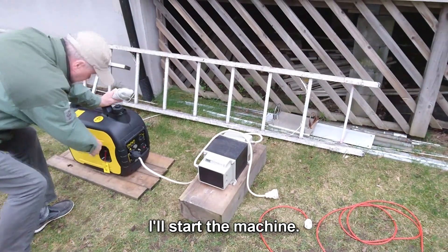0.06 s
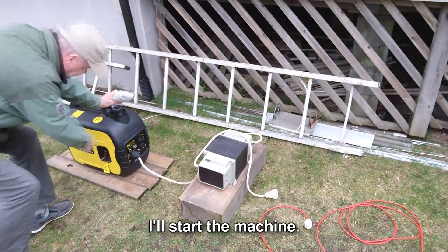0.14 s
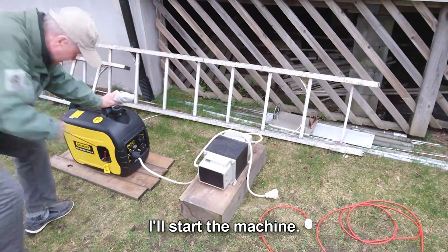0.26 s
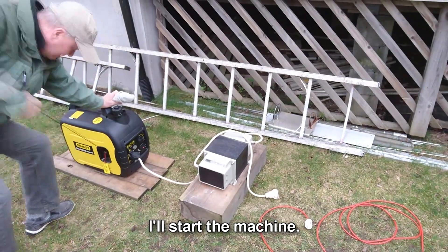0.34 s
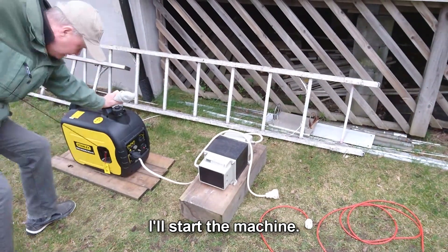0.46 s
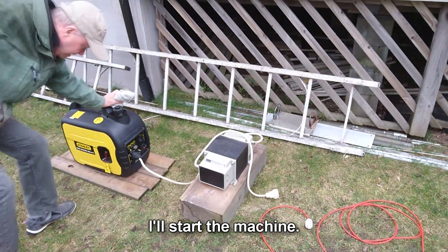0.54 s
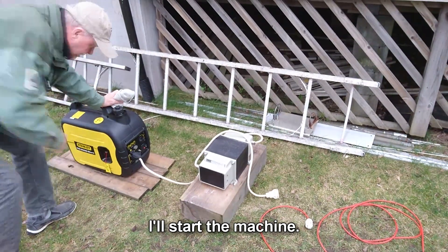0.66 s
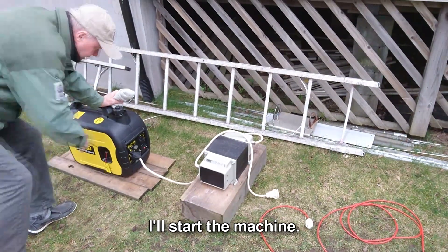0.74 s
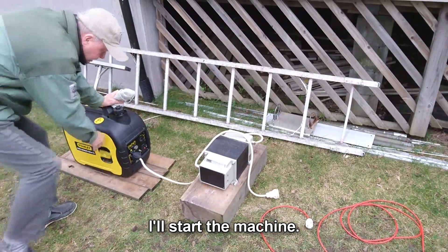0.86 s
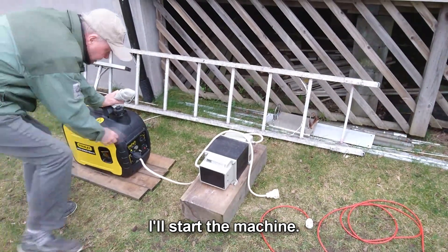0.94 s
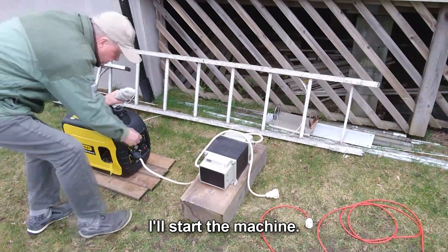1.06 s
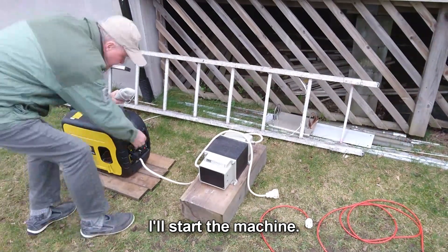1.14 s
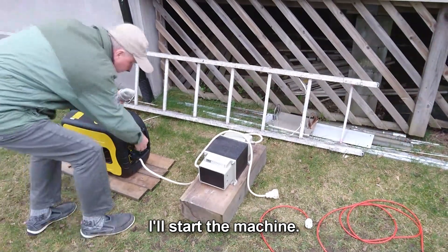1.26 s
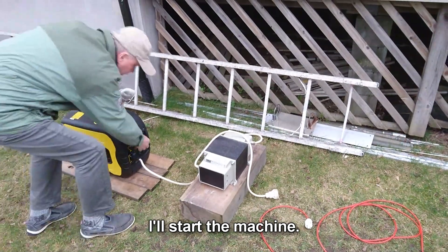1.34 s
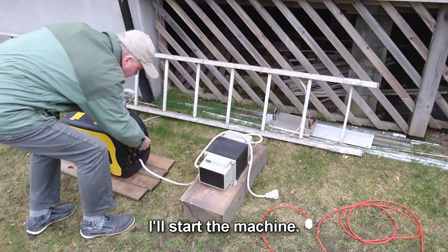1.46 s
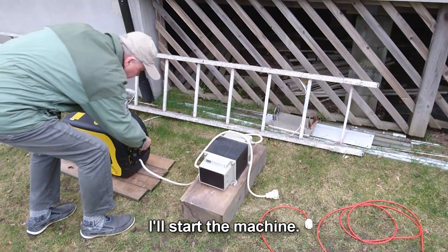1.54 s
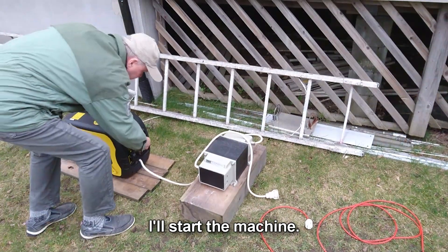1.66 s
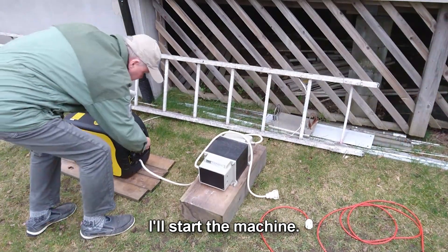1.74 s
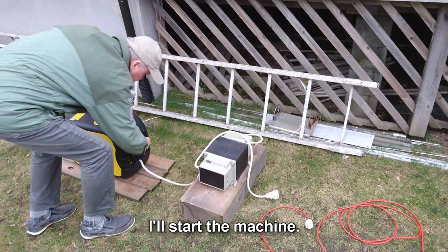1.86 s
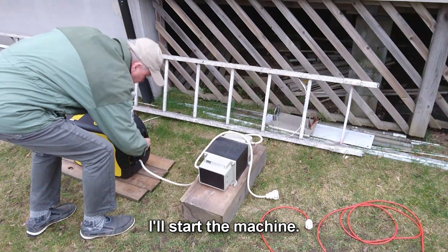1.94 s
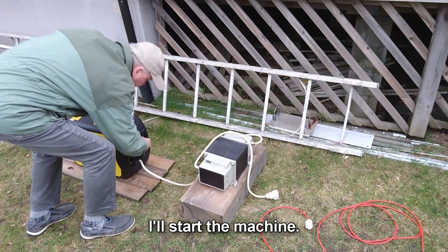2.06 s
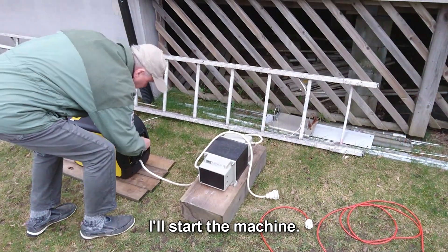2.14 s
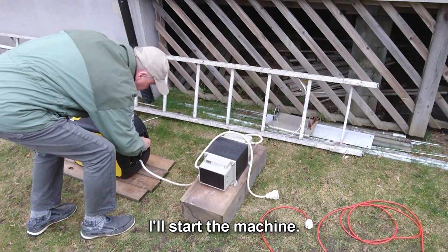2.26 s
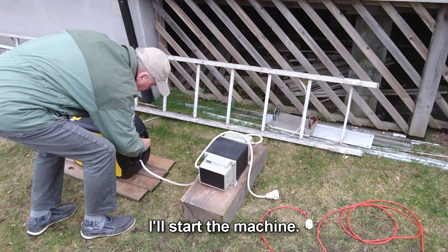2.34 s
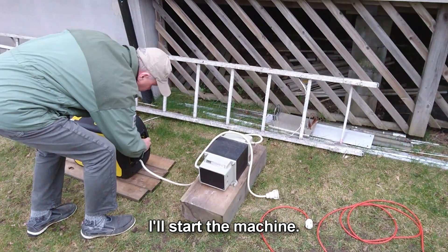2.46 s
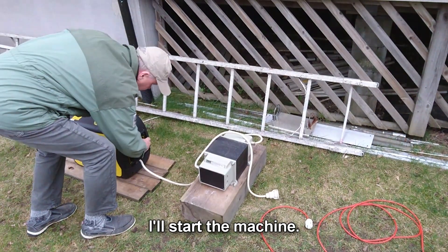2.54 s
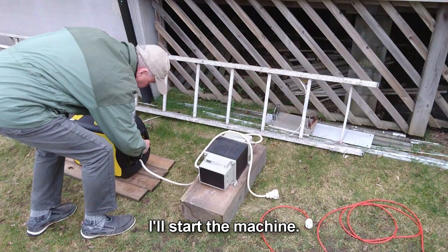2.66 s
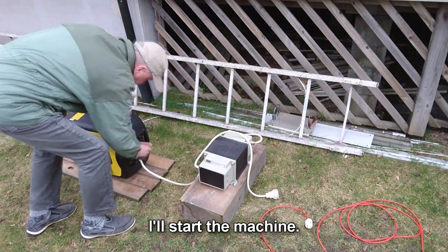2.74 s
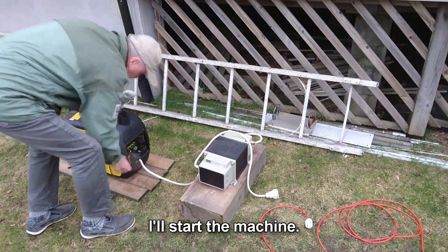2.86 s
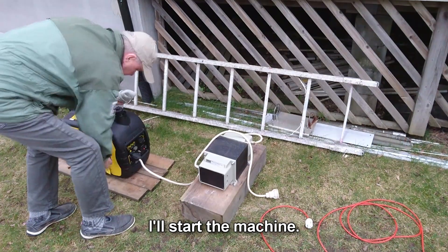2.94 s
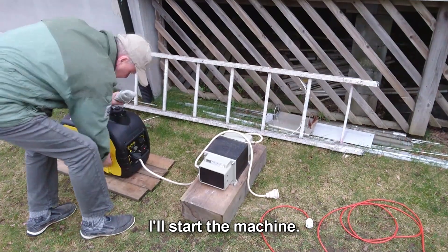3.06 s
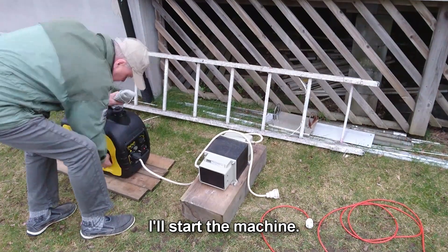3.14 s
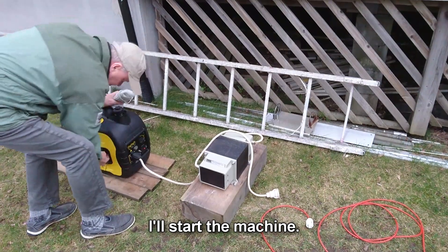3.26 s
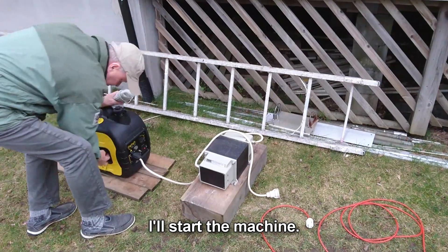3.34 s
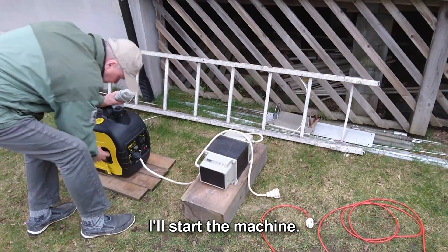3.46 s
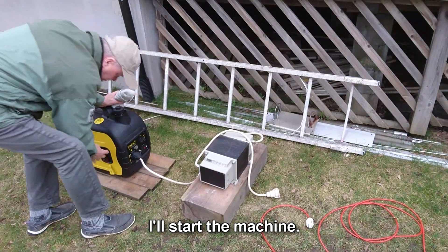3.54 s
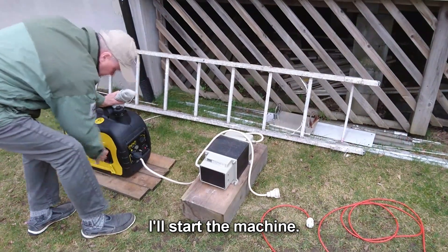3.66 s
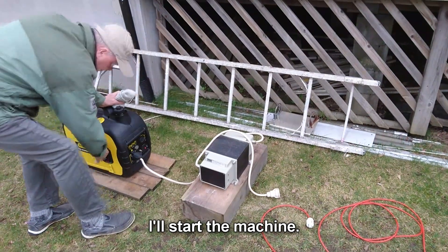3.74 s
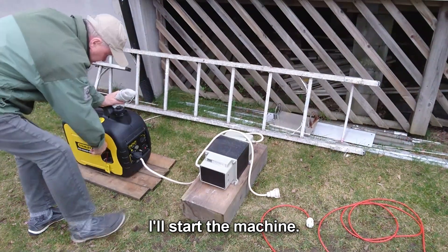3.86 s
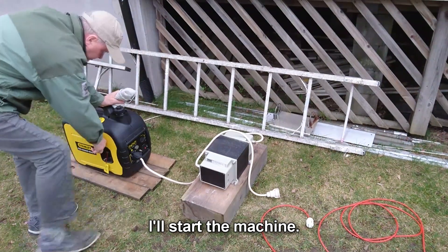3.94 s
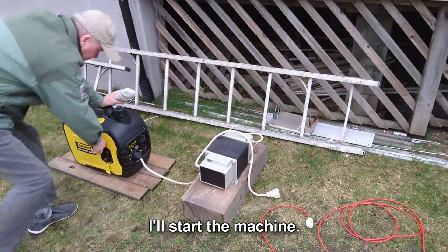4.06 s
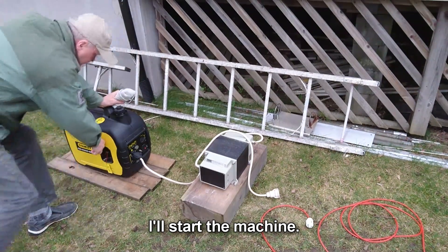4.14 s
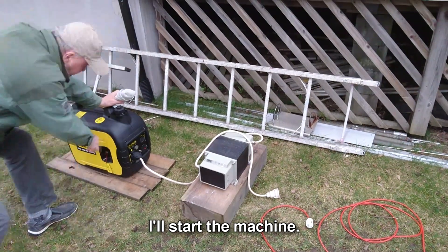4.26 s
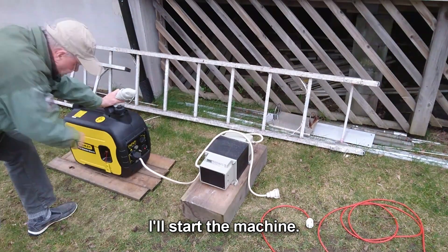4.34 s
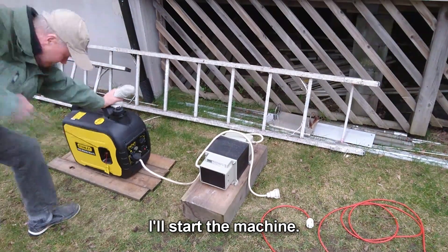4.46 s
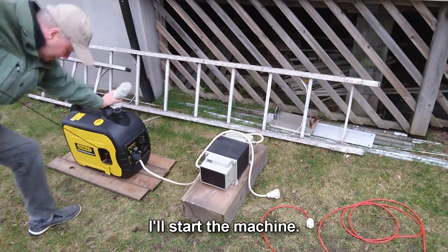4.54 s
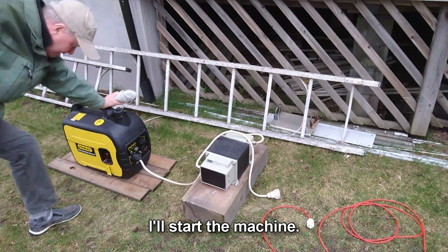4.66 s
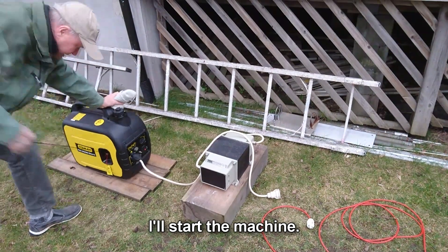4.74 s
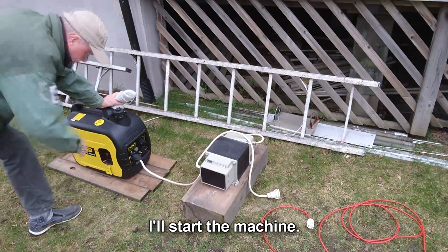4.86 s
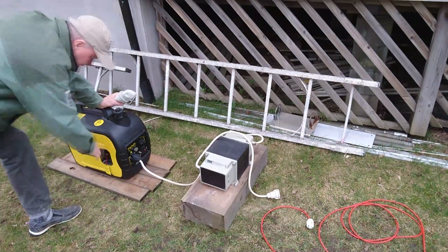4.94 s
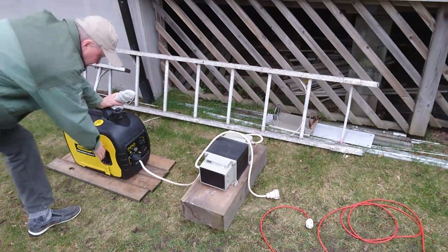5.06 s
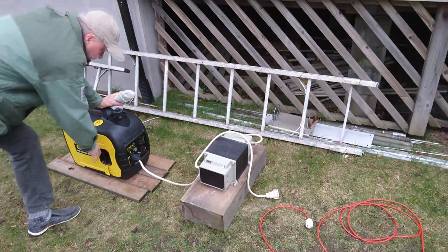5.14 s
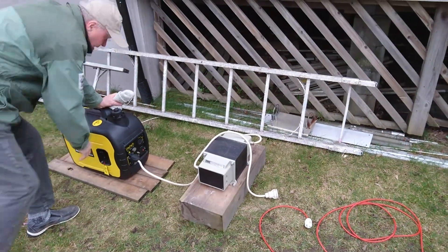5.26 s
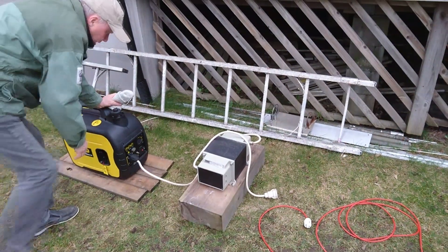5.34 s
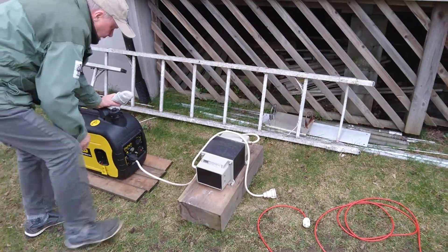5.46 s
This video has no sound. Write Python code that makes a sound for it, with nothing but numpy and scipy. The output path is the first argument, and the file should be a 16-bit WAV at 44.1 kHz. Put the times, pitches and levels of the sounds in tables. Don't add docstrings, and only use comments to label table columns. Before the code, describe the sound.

In a quiet yard, a portable petrol generator on wooden boards gets a cord pull: rising reel whine, clatter, low piston gasps. It fails and the handle slaps the plastic shell hard. Soft shuffling and a few knob clicks follow, then a second pull catches, coughing into quickening heavy puffs and bright valve ticking. Close, nearly mono microphone, flattening on the loudest beats.

```python
import sys
import numpy as np
from scipy import signal
from scipy.fft import rfft, irfft
from scipy.io import wavfile

SR = 44100
rng = np.random.default_rng(int(sys.argv[2]) if len(sys.argv) > 2 else 0)


def store_wav(level_fs):
    pcm = np.round(np.clip(np.atleast_2d(level_fs), -1, 1) * 32767)
    wavfile.write(sys.argv[1], SR, pcm.T.astype(np.int16))


def nominal_scale(level):
    x = np.asarray(level, float) / 20
    return 10 ** x


N = 242991
TIME = np.arange(N) / SR

# (frequency [Hz], level [dB per Hz])
YARD_CURVE = [(8.8, -47), (15, -14.5), (54, 1.5), (67, -5), (81, -26.5), (133, -21), (344, -34.5),
              (400, -25.5), (520, -54), (880, -120)]
RUMBLE_CURVE = [(12, -23.5), (22, -1.5), (55, -0.5), (100, -5), (200, -15), (300, -22), (500, -65)]
CLATTER_CURVE = [(120, -27), (200, -10.5), (405, 0.5), (534, 1), (609, -1), (972, -5.5), (1140, -3.5),
                 (1690, -11), (2390, -12.5), (3500, -22.5), (4550, -41.5), (7700, -120)]
HISS_CURVE = [(1470, -9), (2500, -5.5), (3220, -22), (3590, -8), (5990, -11), (8070, -14), (11500, -10.5),
              (15400, -29.5), (16400, -30)]
# (frequency [Hz], level [dB per Hz])
SPIT_CURVE = [(1760, -53), (3000, -9.5), (4100, -1.5), (6790, -1), (7450, -5.5), (10800, 3), (14500, -15),
              (16400, 4)]
# (frequency [Hz], side against mid [dB])
WIDTH_CURVE = [(25, -30), (110, -28), (200, -23), (380, -24), (700, -32), (1290, -22.5), (2380, -16.5),
               (4400, -15.5), (8120, -22), (15000, -32)]
# (time [s], shaking [dB], air and cord flow [dB])
EFFORT = [(0.0, -62, -65), (0.15, -51.5, -60), (0.35, -41.5, -51), (0.6, -41.5, -53), (0.84, -45, -56),
          (1.2, -49.5, -62.5), (1.6, -63, -68.5), (2.3, -66, -76), (3.04, -66.5, -65.5),
          (3.56, -67.5, -73.5), (3.9, -58, -67.5), (4.26, -67.5, -69), (4.355, -44, -62.5), (4.4, -48, -50),
          (4.57, -39.5, -43.5), (5.06, -38, -57.5), (5.26, -35.5, -52), (5.51, -31.5, -46)]
# (time [s], level [dB])
ROCKING = [(0.06, -36.5), (0.161, -33), (0.39, -38), (0.52, -29.5), (0.67, -42), (0.911, -30),
           (1.11, -43.5), (1.45, -52), (1.752, -47), (1.931, -54), (2.149, -48), (3.09, -37.5), (3.15, -38),
           (3.34, -42), (3.652, -44), (3.839, -37), (3.938, -31), (4.321, -34), (4.56, -34), (4.689, -29),
           (4.78, -24.5), (4.861, -25.5), (4.98, -23.5), (5.09, -20.5)]

# (time [s], peak [dB], ring [Hz], crack against ring [dB])
STEPS = [(1.398, -50, 410, -23), (1.439, -55, 1430, -1), (1.491, -55.5, 534, -1), (1.55, -48.5, 625, -25),
         (1.724, -51.5, 472, -20), (1.907, -42.5, 747, -15.5), (1.97, -49.5, 640, -41),
         (2.069, -55, 933, 3.5), (2.169, -63.5, 440, 3.5), (3.816, -41.5, 460, -28),
         (3.829, -42.5, 490, -4.5), (3.863, -64, 915, 11.5), (3.927, -45, 564, -12),
         (3.972, -59, 428, -0.5), (4.197, -56, 780, 1.5)]
KNOBS = [(2.988, -43.5, 697, -39), (3.086, -45, 400, -24), (3.1, -29.5, 1920, -22), (3.135, -20, 916, 0),
         (3.181, -39.5, 2100, -24), (3.302, -55, 3820, -11), (3.311, -46, 4100, -10.5),
         (3.315, -42.5, 475, -14), (3.328, -39, 900, -12), (3.436, -33, 1370, -17), (3.498, -38, 847, -30),
         (3.653, -38.5, 1090, -18), (3.702, -39, 1190, -23), (3.74, -43.5, 1050, -20.5),
         (3.767, -44, 507, -25)]
JOLTS = [(0.04, -40, 401, -8.5), (0.118, -41, 452, 0), (0.241, -37.5, 2360, -9.5), (0.373, -30.5, 496, -10),
         (0.471, -28, 705, -13), (0.545, -23, 760, -15), (0.637, -32, 470, -20), (0.746, -36.5, 521, -23),
         (0.786, -38, 506.7, -24), (4.29, -46, 455, -4), (4.333, -35.5, 2180, -16), (4.668, -23, 776, -22)]
HANDLE = [(0.879, -9, 1140, -4.5), (0.887, -9, 840, -18), (0.893, -9, 1250, -5.5), (0.898, -6, 1420, 0),
          (0.903, -10, 1538, -1.5), (0.916, -18.5, 2310, -26), (0.94, -15.5, 2140, -6),
          (0.989, -29.5, 1140, -8), (1.018, -38.5, 730, -3), (1.113, -39.5, 900, -13),
          (1.143, -29.5, 810, -21), (1.219, -40, 2300, -13), (1.228, -38.5, 505, -29),
          (5.12, -13, 1050, -4), (5.125, -15, 1240, -8), (5.13, -9.5, 3900, -8), (5.135, -17.5, 2450, 2.5)]

# (time [s], tooth rate [Hz], level [dB])
REEL_OUT = [(0.16, 330, -55), (0.19, 600, -37), (0.228, 1000, -39), (0.247, 1160, -33), (0.265, 1450, -50),
            (0.34, 2400, -52), (0.39, 3000, -51), (0.436, 3060, -53), (0.52, 3900, -59)]
REEL_COAST = [(0.59, 2810, -64), (0.63, 3330, -62), (0.66, 3490, -61), (0.68, 3637, -63)]
REEL_BACK = [(0.69, 3900, -58), (0.735, 3000, -59), (0.761, 2600, -60), (0.79, 2480, -57),
             (0.839, 2000, -60), (0.859, 2200, -59), (0.885, 2950, -50)]
REEL_AGAIN = [(4.3, 376.1, -58), (4.336, 614.0, -41), (4.38, 1170, -43), (4.41, 1900, -48),
              (4.43, 2320, -41), (4.46, 2700, -50), (4.52, 3350, -48), (4.585, 3640, -51)]
# (centre [Hz], width [Hz], level [dB])
OCTAVE_BANDS = [(3600, 700, -1), (6200, 1300, 1.5)]
# (centre [Hz], width [Hz], level [dB])
CASING_MODES = [(1220, 55, 0), (2430, 110, -3), (3740, 81, -6), (5500, 73, -11), (7280, 40, -9),
                (8730, 46, -11), (9510, 110, -11), (11200, 72, -13)]

# (time [s], length [ms], suction [dB], push [dB])
STROKES = [(.047, 5.5, -17, -68), (0.257, 12.4, -10, -7), (0.315, 6.8, -21, -23), (0.408, 15.2, -13, -8),
           (0.473, 3.5, -14, -18), (0.516, 16.7, -8.5, -2), (0.549, 17.8, -3.5, -3.5),
           (0.597, 39.6, -13.5, -28), (0.678, 14, -6.5, -1), (0.736, 5.2, -33, -19.5),
           (0.918, 3.4, -8.5, -16.5), (1.144, 4.7, -26.5, -26.5), (4.59, 11.6, -4.5, -9),
           (4.628, 8.3, -14.5, -39), (4.653, 21.8, -45, -6), (4.691, 13.2, -7.5, -15),
           (4.714, 6.1, -10.5, -16)]
# (centre [Hz], width [Hz], level [dB])
GEAR_BANDS = [(2370, 500, 6), (3830, 780, 3), (5880, 2000, -5.5), (7400, 500, -12)]
# (time [s], peak [dB])
STUMBLING_TICKS = [(0.5476, -23.5), (0.5751, -17.5), (0.664, -30), (0.675, -28), (4.547, -41), (4.565, -29),
                   (4.612, -15), (4.6182, -19), (4.6432, -6), (4.6489, -8.5), (4.656, -17), (4.672, -19),
                   (4.682, -19), (4.7056, -14.5), (4.7142, -20.5), (4.7451, -22), (4.7881, -10.5),
                   (4.8185, -21), (4.8546, -37.5), (4.8916, -49), (4.93, -24.5), (4.9604, -14.5),
                   (4.982, -34.5), (5.021, -31), (5.044, -33), (5.082, -35)]
# (time [s], peak [dB])
VALVE_TICKS = [(5.1822, -20), (5.197, -10.5), (5.2056, -15), (5.217, -16), (5.2305, -17), (5.243, -8),
               (5.2514, -16), (5.2628, -11), (5.2723, -10), (5.2869, -12), (5.3046, -13), (5.3157, -14),
               (5.3283, -4), (5.3432, -11), (5.3552, -11), (5.3688, -8.5), (5.3796, -9.5), (5.3917, -13.5),
               (5.4092, -7.5), (5.414, -9), (5.4294, -14), (5.4412, -3), (5.4521, -14), (5.4642, -9),
               (5.471, -9), (5.478, -14.5), (5.4854, -14.5), (5.4988, -9)]
# (time [s], four-stroke cycles done [count])
CRANK = [(4.748, 0), (4.893, 2), (5.019, 4), (5.126, 6), (5.22, 8), (5.304, 10), (5.381, 12), (5.452, 14),
         (5.522, 16)]
# (time [s], exhaust puff [dB], intake gulp [dB], puff lag [cycles])
BURN = [(4.74, -13, -22, .56), (4.8, -13, -13, .56), (4.87, -19, -13, .5), (4.93, -30, -15, .55),
        (5.06, -30, -13, .53), (5.1, -11, -14, .42), (5.15, -5, -10, .47), (5.33, -4, -9, .66),
        (5.41, -3, -8, .74), (5.51, -7, -8, .72)]
# (centre [Hz], width [Hz], level [dB])
MUFFLER_MODES = [(59.7, 35, -23.5), (114.8, 39, 1.5), (183.6, 50, -5), (416, 204, -17.5)]

BOARD_HZ, BOARD_WIDTH_HZ = 156, 30
LEAN_DB_PER_S, SETTLE_DB_PER_S = 354, 170
RUMBLE_DB, RUMBLE_FOLLOWS = -32.5, 0.89
YARD_DB, MIC_HISS_DB = -54.5, -73
# thud against ring in dB, t60 in s
STEP, CLICK, JOLT, SLAP = (6.9, 0.12), (-5.5, 0.027), (2.3, 0.049), (-7, 0.046)
TICK_T60_S, VALVE_T60_S = 0.0198, 0.0095
GEAR_FROM_S, GEAR_DB, GEAR_DB_PER_S = 4.56, -50, 8
OVERLOAD = 0.292
CUTOFF_HZ = 16500


def in_time(rows):
    s, *columns = np.transpose(rows)
    return [np.interp(TIME, s, c) for c in columns]


def rms_one(x):
    return x / np.sqrt(np.mean(x ** 2) + 1e-20)


def coloured(x, spectrum):
    hz, db = np.transpose(spectrum)
    grid = np.maximum(np.arange(len(x) // 2 + 1) * SR / len(x), 1)
    gain = nominal_scale(np.interp(np.log(grid), np.log(hz), db))
    return irfft(rfft(x) * gain, len(x))


def drift(rate_hz):
    r = np.exp(-2 * np.pi * rate_hz / SR)
    walk = signal.lfilter([1], [1, -2 * r, r * r], rng.standard_normal(N + SR))
    return rms_one(walk[SR:])


def resonance(x, hz, width_hz):
    r = np.exp(-np.pi * width_hz / SR)
    poles = [1, -2 * r * np.cos(2 * np.pi * hz / SR), r * r]
    return signal.lfilter([(1 - r * r) / 2, 0, (r * r - 1) / 2], poles, x)


def band(low_hz, high_hz):
    return signal.butter(3, [low_hz, high_hz], "band", fs=SR, output="sos")


def puff(u, suction, push, sharp):
    return np.tanh(sharp * u) * np.exp(-u ** 2) * np.where(u < 0, suction, push)


def bed(level_db, spectrum, flicker_db, rate_hz, grain=1):
    noise = rms_one(coloured(rng.standard_normal(N) ** grain, spectrum))
    return nominal_scale(level_db + flicker_db * drift(rate_hz)) * noise


def yard():
    return bed(YARD_DB, YARD_CURVE, 1.0, 4)


def machine_bed():
    shake_db, flow_db = in_time(EFFORT)
    rumble_db = np.minimum(RUMBLE_DB + RUMBLE_FOLLOWS * (shake_db + 39.5), -32.0)
    rumble = bed(rumble_db, RUMBLE_CURVE, 4.8, 7.3)
    clatter = bed(shake_db, CLATTER_CURVE, 2.6, 29, grain=5)
    hiss = bed(flow_db, HISS_CURVE, 2.2, 20)
    return rumble + clatter + hiss


def boards():
    shifts = [db - np.maximum(LEAN_DB_PER_S * (s - TIME), SETTLE_DB_PER_S * (TIME - s)) for s, db in ROCKING]
    level_db = np.max(shifts, axis=0)
    shake = resonance(resonance(rng.standard_normal(N), BOARD_HZ, 69), 0.75 * BOARD_HZ, 77)
    return nominal_scale(level_db - 2.0) * rms_one(shake)


def knock(ring_hz, crack_db, thud_db, t60):
    size = SR // 4
    t = np.arange(size) / SR
    hit, other = rng.standard_normal((2, size)) * nominal_scale(-60 * t / t60)
    luck_db = 3 * rng.standard_normal(len(CASING_MODES))
    modes = sum(nominal_scale(db + 4 + luck) * resonance(hit, hz, 2.8 * width)
                for (hz, width, db), luck in zip(CASING_MODES, luck_db))
    ring = nominal_scale(13) * resonance(hit, ring_hz, 0.25 * ring_hz)
    shell = signal.sosfilt(band(350, min(2.6 * ring_hz, 3800)), hit + modes + ring)
    crack = signal.sosfilt(band(3700, 12800), other + modes)
    thud = resonance(resonance(other, BOARD_HZ, 3 * BOARD_WIDTH_HZ), 260, 400)
    shell, thud, crack = [p / np.abs(p).max() for p in (shell, thud, crack)]
    return shell + nominal_scale(thud_db - 5.5) * thud + nominal_scale(crack_db) * crack


def knocks():
    out = np.zeros(N + SR)
    for rows, kind in ((STEPS, STEP), (KNOBS, CLICK), (JOLTS, JOLT), (HANDLE, SLAP)):
        for s, peak_db, ring_hz, crack_db in rows:
            blow = knock(ring_hz, crack_db, *kind)
            at = round(s * SR)
            out[at:at + len(blow)] += nominal_scale(peak_db + 2) * blow
    return out[:N]


def wall(x):
    t = np.arange(SR // 4) / SR
    echo = rng.standard_normal(len(t)) * nominal_scale(-60 * t / 0.17) * (t > 0.006)
    return signal.fftconvolve(x, echo / np.sqrt(np.sum(echo ** 2)))[:N]


def reel(rows):
    hz, level_db = in_time(rows)
    from_rest, winding_back = rows[0][1] < 1000, rows[0][1] > 3000
    turn = 2 * np.pi * np.cumsum(hz * (1 + 0.025 * drift(200))) / SR
    on = np.clip(np.minimum(TIME - rows[0][0], rows[-1][0] - TIME) / 0.03, 0, 1)
    tone = on * nominal_scale(level_db + 2.5 + 4 * drift(50)) * np.sin(turn) * (1 + 0.25 * drift(300))
    upper_db = np.median(np.transpose(rows)[2]) - 2
    upper = on * nominal_scale(upper_db + 5 * drift(30)) * np.sin(2 * turn)
    octave = sum(nominal_scale(db) * resonance(resonance(upper, centre, width), centre, 1.5 * width)
                 for centre, width, db in OCTAVE_BANDS)
    noise = on * rng.standard_normal(N)
    rattle = nominal_scale(-30.5 - 1.4 * hz / 1000) * noise * np.clip(hz / 1000 - 0.3, 0, 1) * from_rest
    spring = nominal_scale(-44.5) * resonance(noise, 6200, 220) * winding_back
    shell = nominal_scale(14.5) * resonance(tone + rattle, 1160, 35) + resonance(tone, 2400, 300)
    return tone + octave + spring + shell


def cranking():
    return sum(1.3 * puff((TIME - s) / (ms / 1000), nominal_scale(dip_db), nominal_scale(push_db), sharp=1.71)
               for s, ms, dip_db, push_db in STROKES)


def gear():
    since = TIME - GEAR_FROM_S
    noise = rng.standard_normal(N)
    whirr = sum(nominal_scale(db) * resonance(resonance(noise, hz, width), hz, width) for hz, width, db in GEAR_BANDS)
    level_db = GEAR_DB + GEAR_DB_PER_S * since + 2.5 * drift(30)
    return np.clip(since / 0.0097, 0, 1) * nominal_scale(level_db) * rms_one(whirr)


def ticks():
    shape = np.zeros(N)
    for rows, t60 in ((STUMBLING_TICKS, TICK_T60_S), (VALVE_TICKS, VALVE_T60_S)):
        for s, peak_db in rows:
            since = np.maximum(TIME - s, 0)
            fall_db = 60 * np.maximum(since - 0.001, 0) / t60
            shape += nominal_scale(peak_db - 6.0 - fall_db) * np.minimum(since / 0.00041, 1)
    high_pass = signal.butter(3, 3400, "high", fs=SR, output="sos")
    grit = signal.sosfilt(high_pass, coloured(rng.standard_normal(N), SPIT_CURVE))
    return shape * rms_one(grit)


def engine():
    cycle, = in_time(CRANK)
    exhaust_db, intake_db, lag = in_time(BURN)
    running = np.clip((TIME - CRANK[0][0]) / 0.014, 0, 1)
    since = (cycle - lag + 0.5) % 1 - 0.5
    outflow = 0.19 + 0.7 * np.maximum(lag - 0.62, 0)
    exhaust = nominal_scale(exhaust_db) * puff(since / np.where(since < 0, 0.19, outflow), 1.85, 1.3, sharp=5.0)
    from_gulp = (cycle + 0.5) % 1 - 0.5
    intake = nominal_scale(intake_db) * (0.22 - 1.2 * np.exp(-(from_gulp / 0.047) ** 2))
    air = running * (exhaust + intake)
    rough = air * (1 + 0.8 * rms_one(resonance(rng.standard_normal(N), 300, 500)))
    muffler = sum(1.4 * nominal_scale(db) * resonance(rough, hz, width) * (-1) ** k
                  for k, (hz, width, db) in enumerate(MUFFLER_MODES))
    return air + muffler


def scene():
    blows = knocks()
    mid = yard() + machine_bed() + boards() + blows + nominal_scale(-14.5) * wall(blows)
    mid = mid + reel(REEL_OUT) + reel(REEL_COAST) + reel(REEL_BACK) + reel(REEL_AGAIN)
    mid = mid + cranking() + gear() + ticks() + engine()
    side = nominal_scale(-4) * coloured(wall(mid), WIDTH_CURVE)
    return np.array([mid + side, mid - side])


def top_cut(x):
    return signal.sosfilt(signal.butter(12, 16540, fs=SR, output="sos"), x)


def record(dry):
    hiss = nominal_scale(MIC_HISS_DB) * rms_one(np.diff(rng.standard_normal(N + 1)))
    mid = dry.mean(axis=0)
    side = dry - mid
    flat = np.clip(mid + hiss, -OVERLOAD, OVERLOAD) + side
    low_pass = signal.cheby2(12, 70, CUTOFF_HZ, fs=SR, output="sos")
    return top_cut(signal.sosfilt(low_pass, flat))


dry = scene()
out = record(dry)
store_wav(out)
```